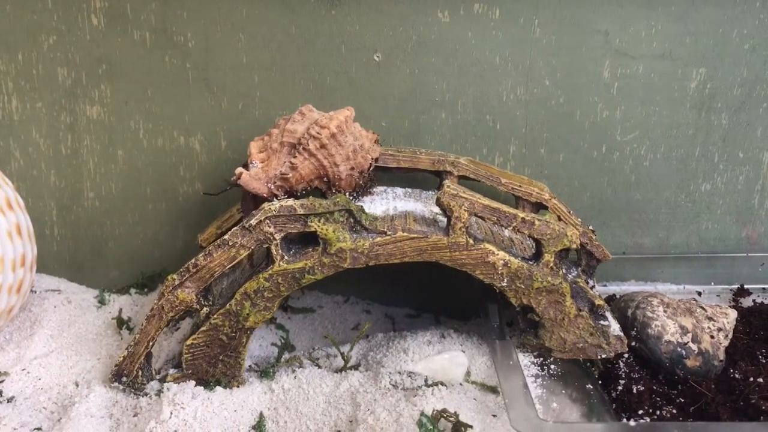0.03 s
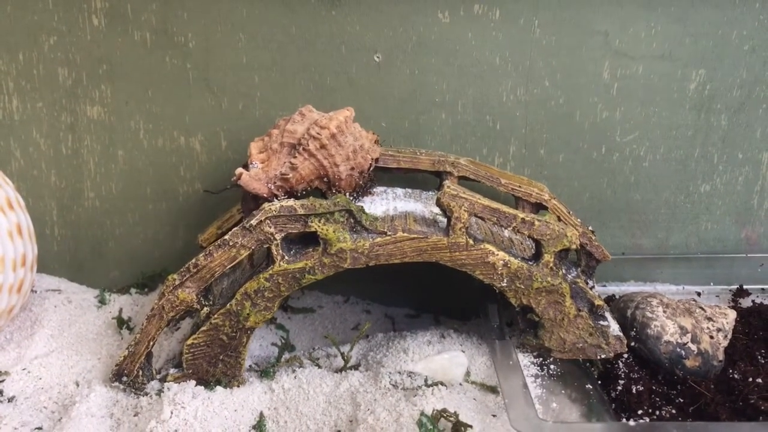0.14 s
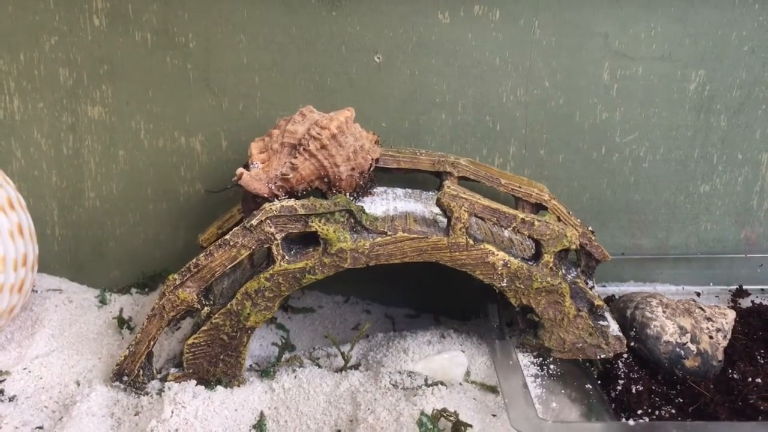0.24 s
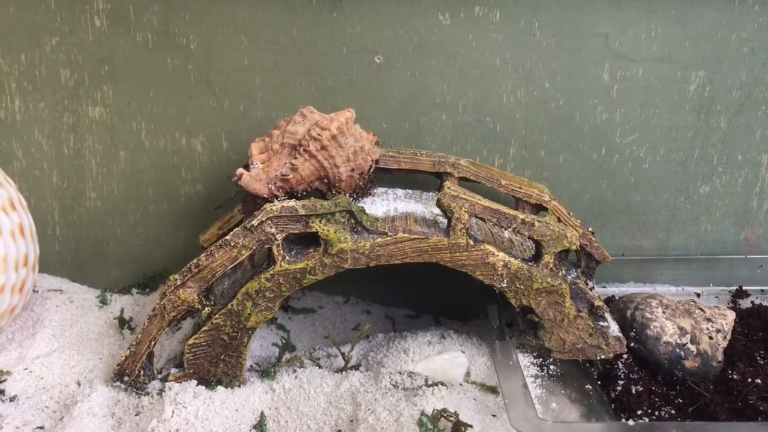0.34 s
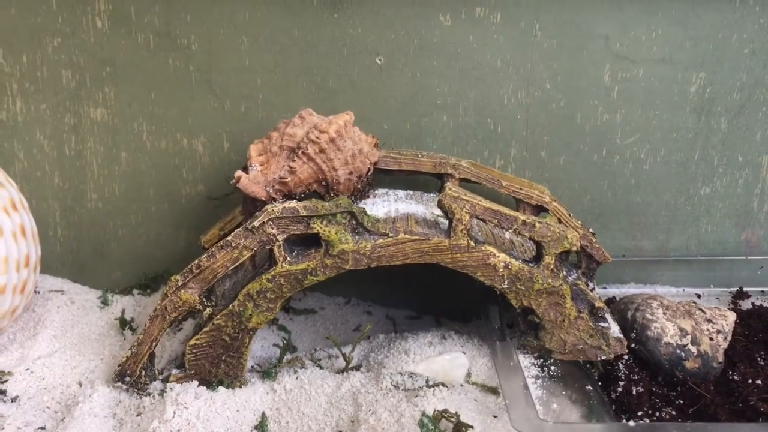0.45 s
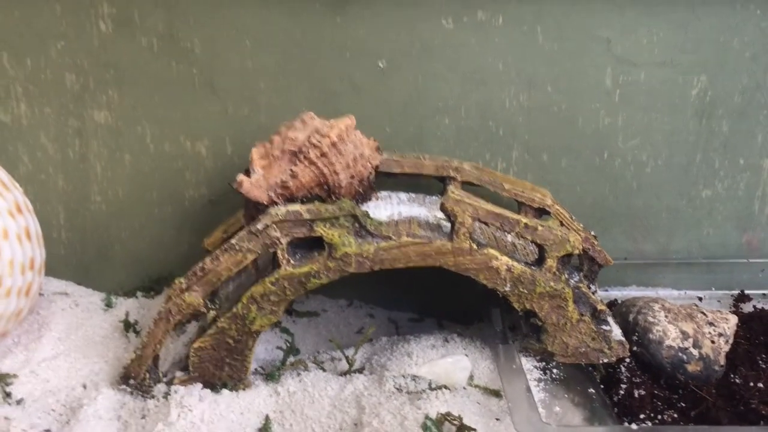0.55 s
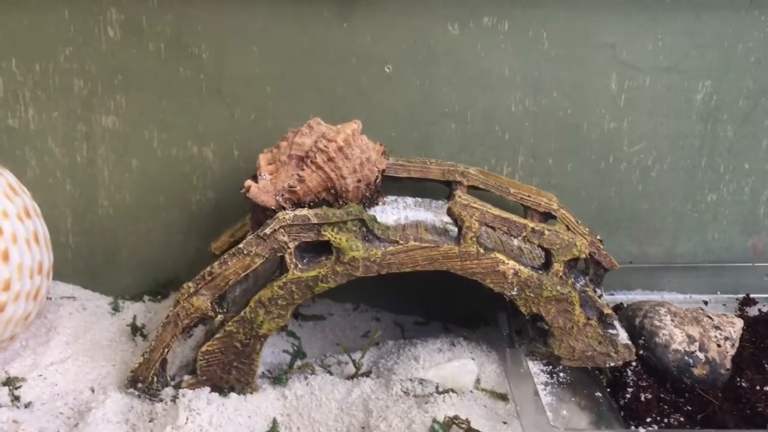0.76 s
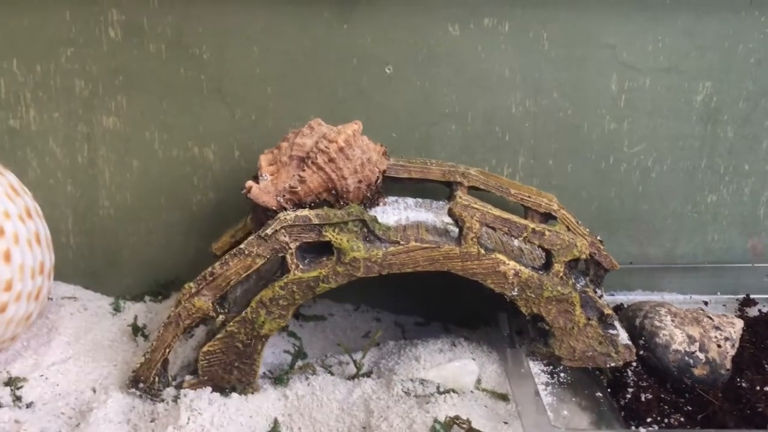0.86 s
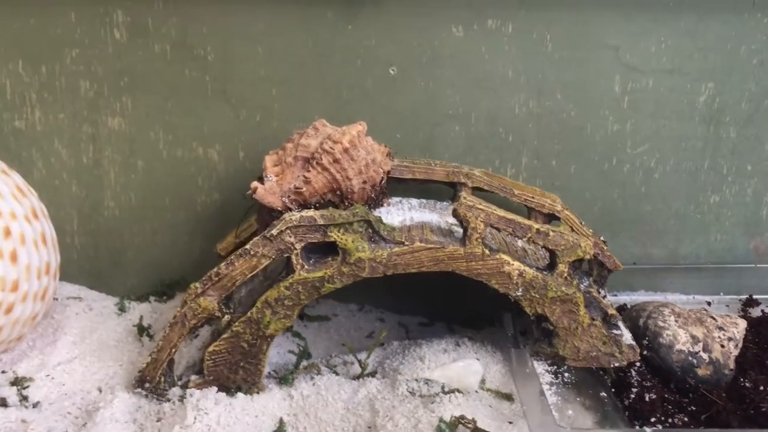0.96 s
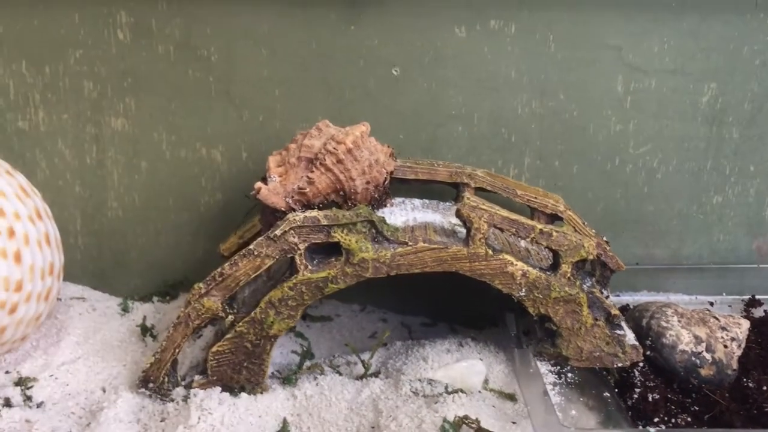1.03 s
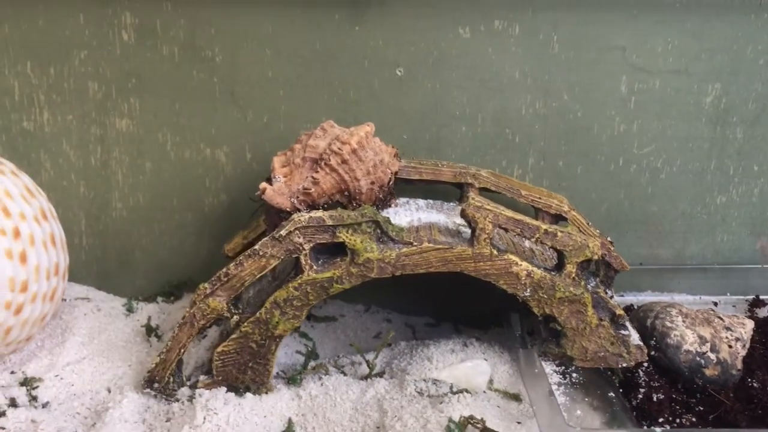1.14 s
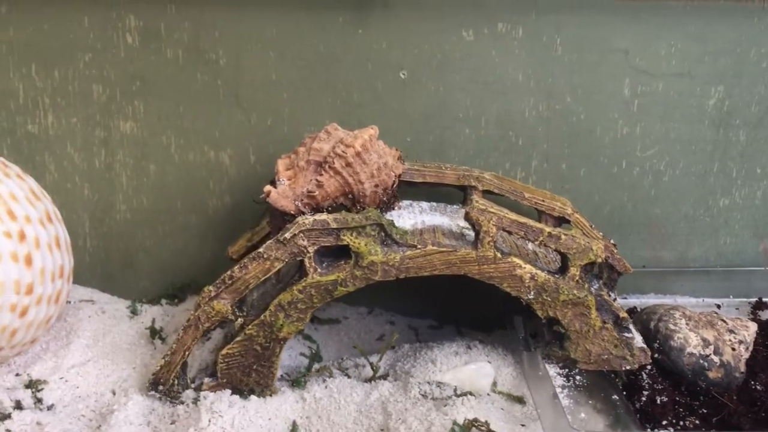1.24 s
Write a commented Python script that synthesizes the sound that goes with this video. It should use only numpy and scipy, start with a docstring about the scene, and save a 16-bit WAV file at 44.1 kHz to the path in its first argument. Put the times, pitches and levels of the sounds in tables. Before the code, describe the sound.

A hand-held camera is bumped, close up in a quiet room. Light hollow taps come first, then one firm knock at 0.2 seconds, a thud with a bright tick and a brief low ring. Softer bumps, small ticks and hollow taps follow from 0.3 to 0.7 seconds, strongest near 0.6, with faint hand rubbing and rumble. After that, faint room hiss remains, with tiny bumps around 1.2 seconds.

```python
"""A hand-held camera body takes one firm knock and a few lighter bumps, close up in a quiet room.
Each hit is a soft thud that sags in pitch, with a weak body ring and a low shudder; the firmer
knocks leave a low ring near 200 Hz, and a loose part inside adds bright ticks. Something hollow
nearby is tapped and rings, with a low hum that swells and fades. Underneath, the shifting hand
rumbles and rubs over a bed of hiss and lumpy bass."""
import sys
import numpy as np
from scipy.fft import rfft, irfft, next_fast_len
from scipy.io import wavfile
from scipy.ndimage import map_coordinates

SR = 44100
rng = np.random.default_rng(int(sys.argv[2]) if len(sys.argv) > 2 else 0)


def to_wav(sig):
    """Store sig (one row per channel, or 1-D mono) as 16-bit WAV at the path in sys.argv[1].

    Samples outside -1..1 are clipped; the rate is SR.
    """
    pcm = np.clip(np.atleast_2d(sig), -1, 1) * 32767
    pcm = np.round(pcm).astype(np.int16)
    wavfile.write(sys.argv[1], SR, pcm.T)  # frames by channels


N = 57330

# Hits on the camera body: t/s, level/dB, thud stretch/x (slower and deeper), tail against thud/dB
BODY_HITS = [(0.064, -49, 0.88, -22), (0.2048, -23, 0.82, -14), (0.236, -39.5, 1.26, -21),
             (0.2562, -47, 1.07, -2), (.317, -56.5, 0.68, 1), (0.3387, -39, 1.05, -7.5),
             (.358, -39.5, 0.97, -7.5), (.377, -48.5, 2.03, -12), (0.407, -51.5, 2.84, -3),
             (0.511, -56.5, 1.2, -10), (.542, -40.5, 0.99, 0), (0.562, -44, 1.06, 6),
             (.571, -49, 0.99, -16), (.581, -35, 0.85, -3.5), (0.594, -40, 2.21, -28), (0.635, -66, 2.1, 9),
             (0.789, -67, 2, -16), (1.121, -63.5, 1.02, -10), (1.2, -63.5, 1.52, -20),
             (1.275, -62, 2.15, -17)]
# Ring of the body: f/Hz, level/dB, t60/s
BODY_MODES = [(167, -37, 0.18), (351, -14, 0.041), (510, -23, 0.0083), (666, -38.5, 0.075),
              (1257, -23.5, 0.024)]
# Tone of the loose, low rattle after a hit: f/Hz, level/dB
SHUDDER_EQ = [(30, -34), (70, -7.5), (200, 6.5), (350, -9), (600, -16), (1200, -36), (3000, -87)]
# Ticks of the loose part: t/s, level/dB, trim on its lower modes and crack/dB
TICK_HITS = [(.0917, -70, -16.5), (0.2052, -44.5, -3), (.2423, -62, -3.5), (.257, -70, -10),
             (0.3413, -68, 3), (0.3599, -65, -3), (0.563, -70.5, -16), (0.581, -68.5, 3), (0.596, -69, -23),
             (.640, -71, -18.5)]
# High ping of a tick: f/Hz, level/dB, t60/s
PING_MODES = [(11210, -16.5, 0.016), (11181, -1, 0.016), (11550, -7, 0.0074)]
# Duller ring under the ping: f/Hz, level/dB, t60/s
TICK_MODES = [(2027, -4.5, 0.022), (2690, -35, 0.0117), (4020, 1, 0.012), (6550, -4, 0.011),
              (9170, -3, .012), (13270, -2, 0.0072)]
# Hollow taps, plus the low 200 Hz ring following the firmer camera knocks (at 0.2212 and 0.584 s):
# t/s, level/dB, centre f/Hz, distance from centre to -6 dB/octaves
TAPS_AND_KNOCK_RINGS = [(.024, -60, 782, 0.22), (.039, -44.5, 821, 0.26), (.041, -68, 2740, 0.9),
                        (.046, -45, 291.7, 0.102), (.055, -45.5, 304, 0.1), (.068, -60, 335, 0.36),
                        (.070, -58, 1110, 1.5), (.078, -60, 720, 0.18), (0.049, -69, 1820, .2),
                        (0.2212, -39.5, 202, 0.38), (.242, -56, 1073, 0.14), (.244, -46.5, 330, 0.38),
                        (.275, -54, 200, .4), (0.3613, -58, 1220, 0.38), (.319, -50, 470, 0.26),
                        (.341, -65.5, 630, 1.65), (.3405, -48, 4270, 0.25), (.361, -53, 3580, 0.23),
                        (.582, -52, 3600, 0.24), (.3605, -61.5, 760, 0.48), (.385, -85, 710, 1.2),
                        (.449, -54, 587.4, 1.1), (.455, -38.5, 408.6, 0.19), (.466, -53, 362, 0.23),
                        (.513, -63, 476, 1.1), (.546, -51, 870, 1.6), (.548, -49, 587, 0.31),
                        (.556, -46, 384, .3), (.566, -46.5, 268, 0.52), (0.584, -41.5, 200, 0.2),
                        (.581, -58, 990, 3.5), (.592, -53, 660, 0.36), (.612, -66.5, 502, 1.8),
                        (.62, -54.5, 1244, 0.19), (.634, -57, 1280, 0.167)]
# Hollow ring shared by the taps and the knock rings: f/Hz, level/dB, t60/s
HOLLOW_MODES = [(198.3, -0.5, .11), (304.5, 1.5, 0.079), (387.4, -6, 0.14), (449, -10, 0.052),
                (577, 2.5, 0.046), (714.5, 4, 0.051), (961, -6.5, 0.076), (1017, -3, 0.038),
                (1237.9, -8, 0.059), (1468, 6.5, 0.019), (1750, -15, 0.069), (2730, -5.5, 0.015),
                (3546, -6.5, 0.025), (4200, -15, 0.011)]
# Pitch and level curves of the hum, one list per swell: t/s, f/Hz, level/dB
HUM_SWELLS = [
    [(0.02, 199, -67), (0.04, 209, -67.5), (0.068, 187, -63), (0.096, 196.3, -66.5), (0.134, 204, -73),
     (0.144, 212, -63.5), (0.19, 203, -66), (0.2, 207, -34)],
    [(0.44, 205.3, -58), (0.448, 203, -68), (0.458, 208.5, -54.5), (0.486, 186.4, -53), (0.5, 207, -56.5),
     (0.54, 212, -53.5)],
    [(0.61, 208, -63), (0.622, 213, -56), (0.636, 219, -68.5), (0.644, 205.4, -53.5), (0.666, 190.3, -53.5),
     (0.73, 185.7, -84.5)],
]
# Envelope of the grip rumble: t/s, level/dB
GRIP_ENVELOPE = [(0.0, -73.5), (0.168, -67), (0.32, -60.5), (0.42, -71.5), (0.472, -64.5), (0.648, -90),
                 (0.74, -105)]
# Tone of the grip rumble: f/Hz, level/dB
GRIP_EQ = [(20, -37), (40, -5.5), (65, -7.5), (110, -7), (200, -24), (400, -25.5), (900, -52)]
# Envelope of the hand rub: t/s, level/dB
RUB_ENVELOPE = [(0.0, -86), (0.012, -79.5), (0.074, -72), (0.09, -101), (0.184, -77), (0.208, -65.5),
                (0.218, -87), (0.528, -85), (0.548, -71.5), (0.558, -84), (0.596, -72), (0.606, -76),
                (0.632, -78), (0.688, -92), (0.698, -86), (0.72, -90)]
# Tone of the hand rub: f/Hz, level/dB
RUB_EQ = [(200, -31.5), (450, -4), (800, -5), (2000, -5), (3200, -9), (6000, -23.5), (10600, -18.5),
          (11250, -24), (11900, -27), (15900, -46)]
# Room tone and microphone hiss: f/Hz, level/dB
ROOM_EQ = [(15, -61), (25, -16), (43, -0.5), (123, 1.5), (144, -6), (307, -9), (342, -12), (381, -13),
           (527, -14), (672, -15.5), (1350, -19), (2030, -17.5), (15800, -28.5)]

THUD_START_HZ, THUD_END_HZ = 283, 58.8  # before each hit's stretch
SAG_S, SWELL_S, TAIL_T60_S = 0.0061, 0.0022, 0.22  # likewise
BODY_RISE_S, TICK_RISE_S, HOLLOW_RISE_S, HUM_FADE_S = 0.00072, 0.00057, 0.0029, 0.0072
SHUDDER_DB, SHUDDER_T60_S, CRACK_T60_S = -19, 0.2, 0.011
GRIT_PER_S, GRIT_DB = 800, 5
ROOM_DB, LUMPS_PER_S, LUMP_DB, LUMP_BELOW_HZ = -69, 25, 3, 254
LOW_CUT_HZ, HIGH_CUT_HZ = 33.6, 15900
DIP_HZ, DIP_WIDTH_HZ, DIP_DB = 10500, 670, -2.5


def body_bumps():
    """Each hit on the body: a soft thud that sags in pitch, a weak ring and a shudder after it."""
    out, shudder_envelope = np.zeros(N + SR), np.zeros(N + SR)
    for start, db, stretch, tail_db in BODY_HITS:
        t = np.arange(SR // 4) / SR / stretch
        settled = 1 - np.exp(-(t / SAG_S) ** 2)
        hz = (THUD_START_HZ + (THUD_END_HZ - THUD_START_HZ) * settled) / stretch
        punch = (np.e * t / SWELL_S / 2) ** 2 * np.exp(-t / SWELL_S)  # peaks at 1
        tail = amp(tail_db - 60 * t / TAIL_T60_S) * settled
        thud = -(punch + tail) * np.sin(2 * np.pi * np.cumsum(hz) / SR)
        add(out, start, amp(db) * (thud + ring(BODY_MODES, BODY_RISE_S, scatter_db=2.5)))
        add(shudder_envelope, start, amp(db + SHUDDER_DB - 60 * t / SHUDDER_T60_S) * settled)
    return out[:N] + shudder_envelope[:N] * noise(SHUDDER_EQ)


def loose_part_ticks():
    """The loose part ticks inside: a high ping over duller modes and a short crack of noise."""
    t, out = np.arange(SR // 4) / SR, np.zeros(N)
    crack_envelope = amp(-60 * t / CRACK_T60_S) * (1 - np.exp(-t / TICK_RISE_S))
    for start, db, trim_db in TICK_HITS:
        crack = crack_envelope * rng.standard_normal(len(t))
        ping = ring(PING_MODES, TICK_RISE_S, scatter_db=3)
        dull_ring = ring(TICK_MODES, TICK_RISE_S, scatter_db=1.5)
        add(out, start, amp(db) * (ping + amp(trim_db) * (crack + dull_ring)))
    return out


def taps_and_knock_rings():
    """Hollow taps and the low ring after the firmer knocks, each favouring modes near its pitch."""
    out = np.zeros(N)
    for start, db, centre_hz, width in TAPS_AND_KNOCK_RINGS:
        modes = []
        for hz, mode_db, t60 in HOLLOW_MODES:
            rolloff_db = 6 * (np.log2(hz / centre_hz) / width) ** 2
            polarity = rng.choice([-1, 1])  # each mode starts inward or outward
            modes.append((polarity * hz, mode_db - rolloff_db, t60))
        add(out, start, amp(db) * ring(modes, HOLLOW_RISE_S, scatter_db=1.5))
    return out


def hollow_hum():
    """The lowest hollow tone: a wavering sine that swells and fades."""
    t, out = np.arange(N) / SR, np.zeros(N)
    for swell in HUM_SWELLS:
        times, hz, db = np.transpose(swell)
        fade = np.clip(np.minimum(t - times[0], times[-1] - t) / HUM_FADE_S, 0, 1)
        phase = 2 * np.pi * np.cumsum(np.interp(t, times, hz)) / SR
        out += np.sqrt(2) * fade * amp(np.interp(t, times, db)) * np.sin(phase)
    return out


def grip_rumble():
    """Low rumble as the hand shifts its grip."""
    return envelope(GRIP_ENVELOPE) * noise(GRIP_EQ)


def hand_rub():
    """Rubbing under the moving hand: noise made gritty by a fast level flutter."""
    grit = amp(GRIT_DB * flutter(GRIT_PER_S))
    return envelope(RUB_ENVELOPE) * grit * noise(RUB_EQ)


def room_tone():
    """A bed of steady hiss over bass that comes in lumps."""
    bed = noise(ROOM_EQ)
    bass = filtered(bed, lambda hz: 1 / (1 + (hz / LUMP_BELOW_HZ) ** 4))
    hiss = bed - bass
    lumps = amp(LUMP_DB * flutter(LUMPS_PER_S) - 1.5)
    return amp(ROOM_DB) * (hiss + bass * lumps)


def amp(db):
    """dB to gain."""
    return 10 ** (np.asarray(db) / 20)


def envelope(points):
    """Gain curve through (t/s, level/dB) points, closed after the last."""
    times, db = np.transpose(points)
    return amp(np.interp(np.arange(N) / SR, times, db, right=-120))


def flutter(per_s):
    """Smooth random modulator with per_s new values a second."""
    points = rng.standard_normal(int(N * per_s / SR) + 4)
    return map_coordinates(points, [np.arange(N) * per_s / SR])


def filtered(x, response):
    """EQ x with a gain given as a function of frequency."""
    size = next_fast_len(N + SR // 2)
    return irfft(rfft(x, size) * response(np.fft.rfftfreq(size, 1 / SR)), size)[..., :N]


def noise(eq):
    """Noise of rms 1, coloured by (f/Hz, level/dB) points."""
    freqs, db = np.transpose(eq)
    white = rng.standard_normal(N)
    x = filtered(white, lambda hz: amp(np.interp(np.log(hz + 1), np.log(freqs + 1), db)))
    return x / np.sqrt(np.mean(x ** 2))


def ring(modes, rise_s, scatter_db):
    """Damped modes after one hit, each a little louder or softer by chance."""
    hz, db, t60 = np.transpose(modes)[:, :, None]
    t = np.arange(SR // 4) / SR
    db = db + scatter_db * rng.standard_normal(db.shape)
    attack = 1 - np.exp(-(t / rise_s) ** 2)
    return attack * (amp(db - 60 * t / t60) * np.sin(2 * np.pi * hz * t)).sum(0)


def add(out, start, x):
    """Mix x into out at start seconds."""
    out[round(start * SR):][:len(x)] += x


def scene():
    """Mono mix of the camera, the hollow object, the hand and the room."""
    hits = body_bumps() + loose_part_ticks() + taps_and_knock_rings()
    return (hits + hollow_hum() + grip_rumble() + hand_rub() + room_tone())[None]


def record(dry):
    """Microphone EQ: a low cut, a shallow treble dip and a brick-wall high cut."""
    def response(hz):
        low_cut = hz ** 4 / (hz ** 4 + LOW_CUT_HZ ** 4)
        dip = amp(DIP_DB * np.exp(-((hz - DIP_HZ) / DIP_WIDTH_HZ) ** 2))
        return low_cut * dip * (hz < HIGH_CUT_HZ)
    return filtered(dry, response)


dry = scene()
out = record(dry)
to_wav(out)
```